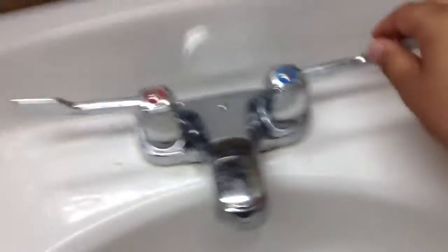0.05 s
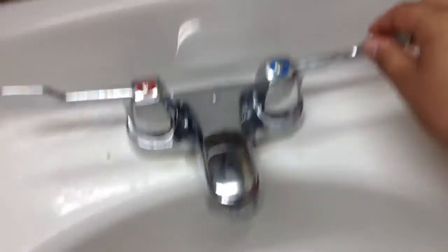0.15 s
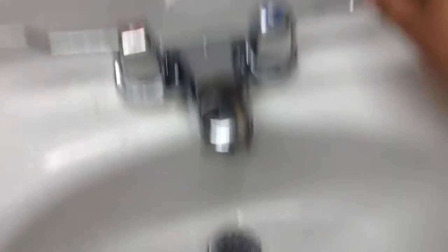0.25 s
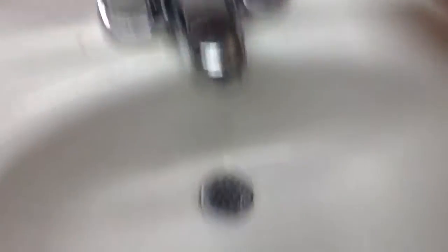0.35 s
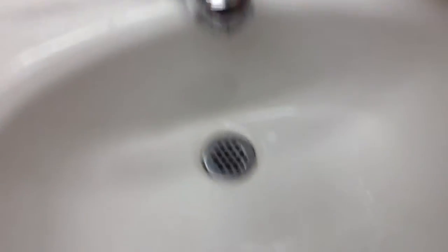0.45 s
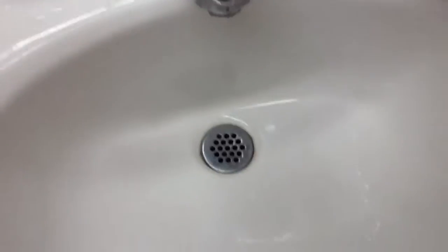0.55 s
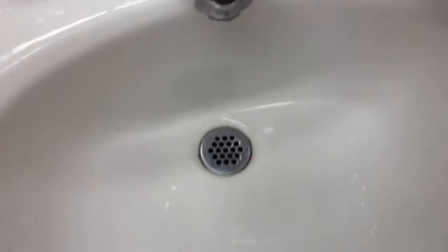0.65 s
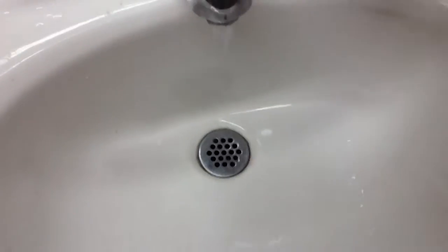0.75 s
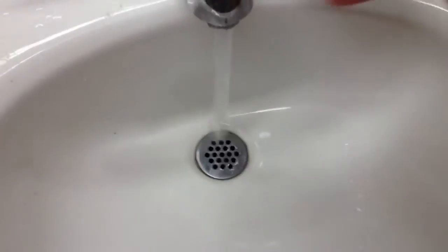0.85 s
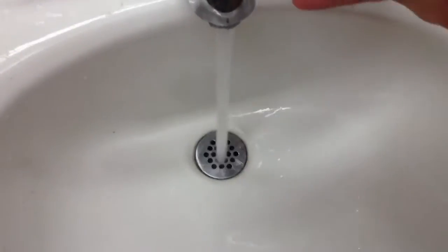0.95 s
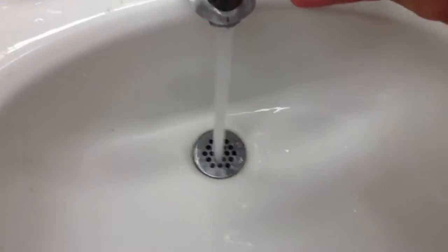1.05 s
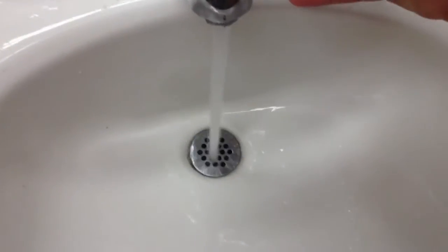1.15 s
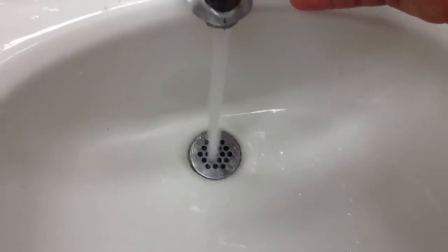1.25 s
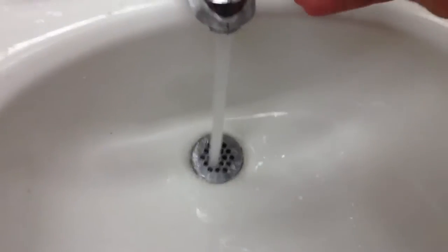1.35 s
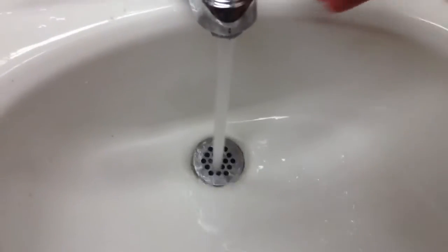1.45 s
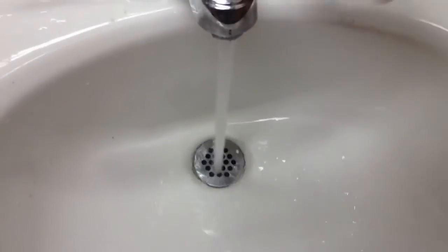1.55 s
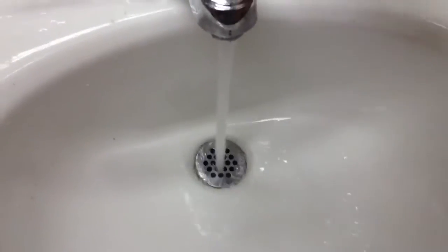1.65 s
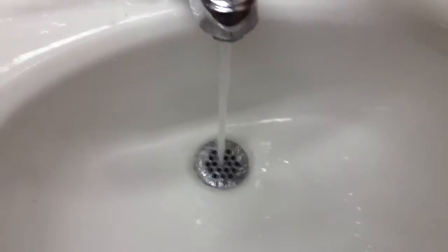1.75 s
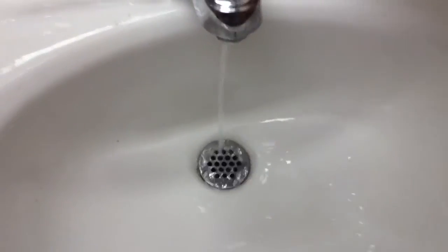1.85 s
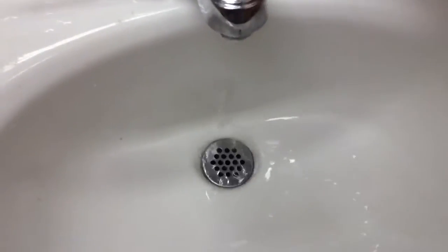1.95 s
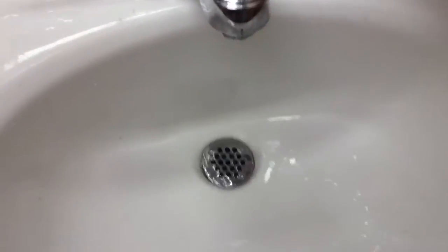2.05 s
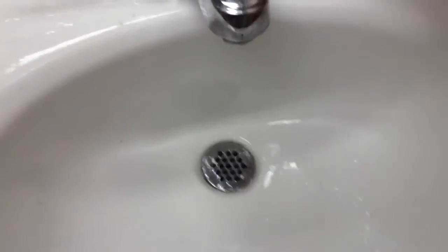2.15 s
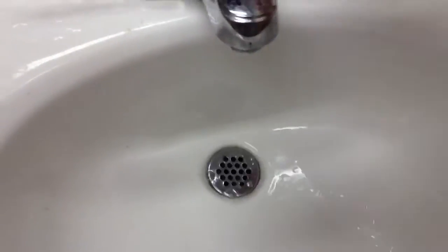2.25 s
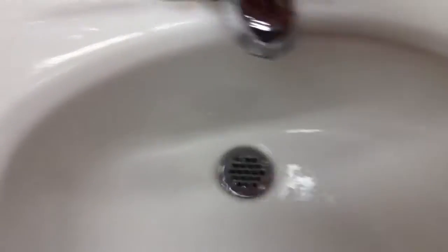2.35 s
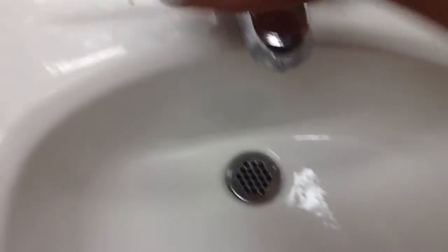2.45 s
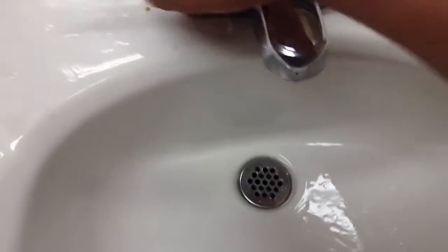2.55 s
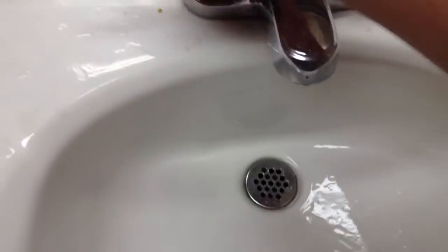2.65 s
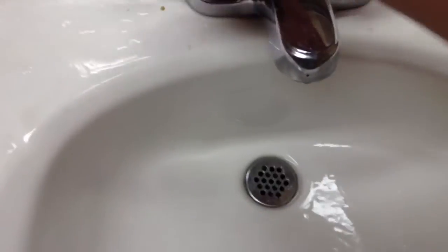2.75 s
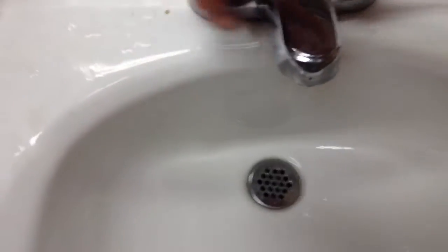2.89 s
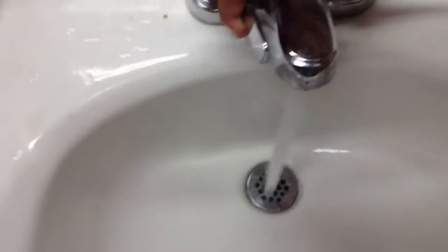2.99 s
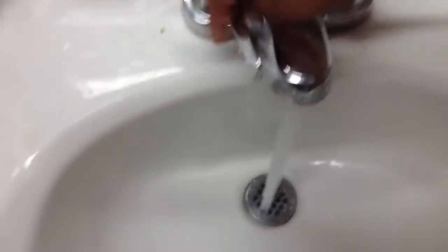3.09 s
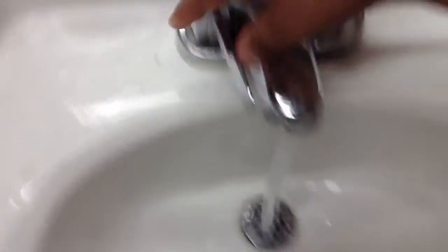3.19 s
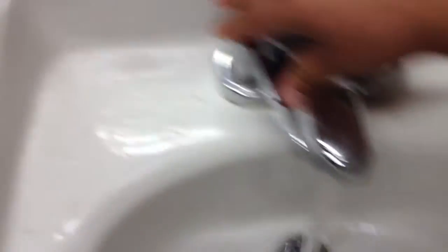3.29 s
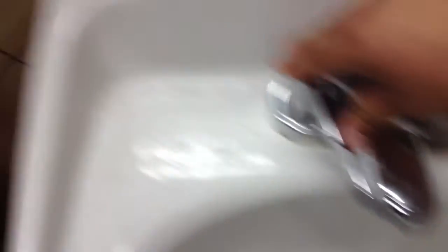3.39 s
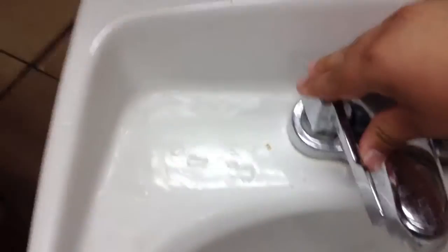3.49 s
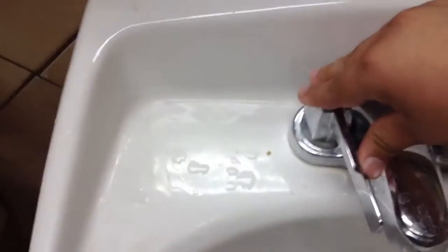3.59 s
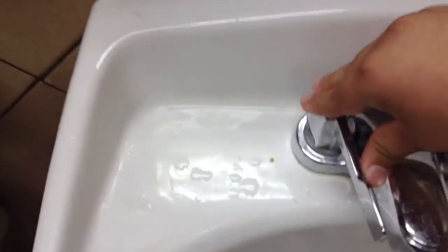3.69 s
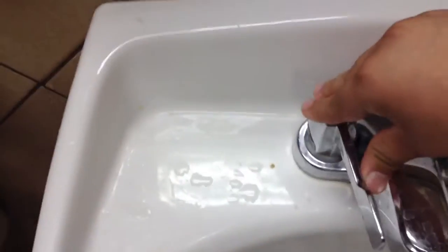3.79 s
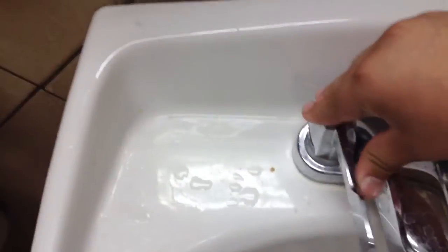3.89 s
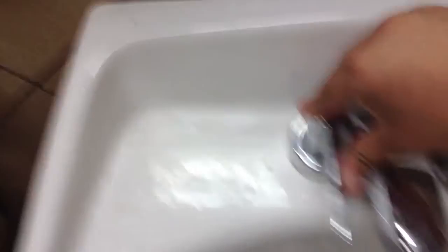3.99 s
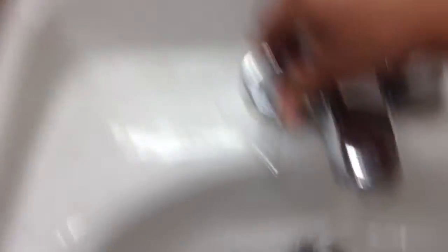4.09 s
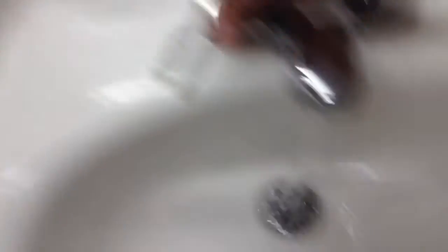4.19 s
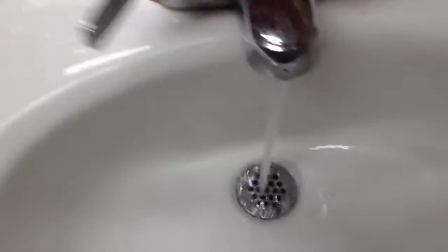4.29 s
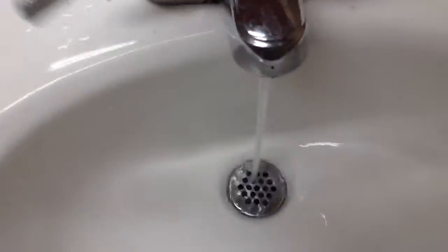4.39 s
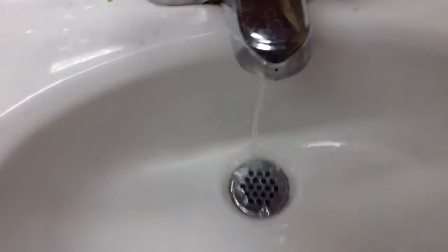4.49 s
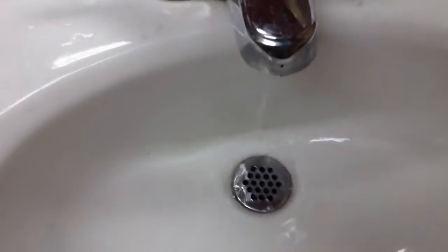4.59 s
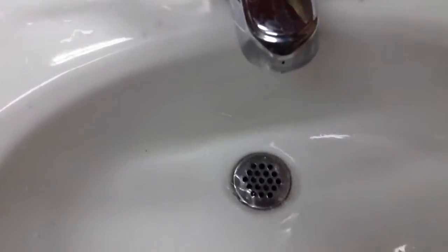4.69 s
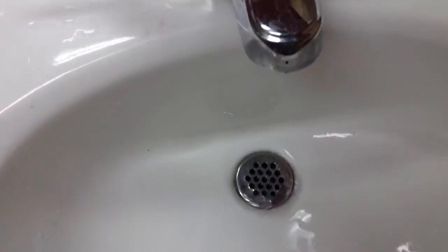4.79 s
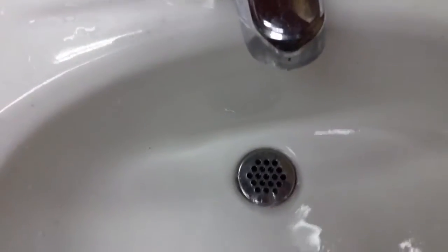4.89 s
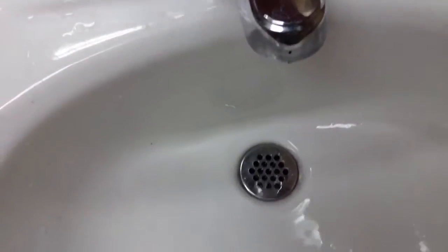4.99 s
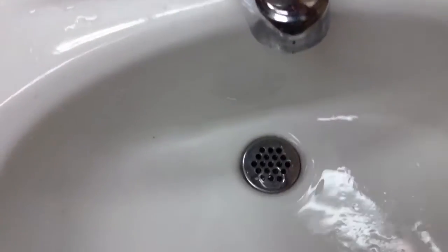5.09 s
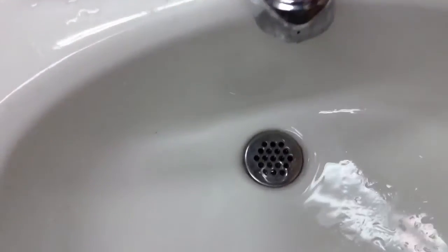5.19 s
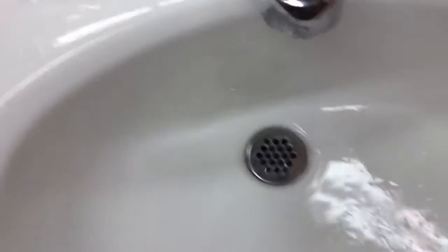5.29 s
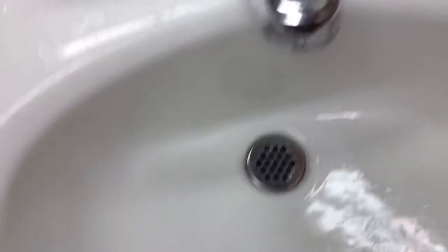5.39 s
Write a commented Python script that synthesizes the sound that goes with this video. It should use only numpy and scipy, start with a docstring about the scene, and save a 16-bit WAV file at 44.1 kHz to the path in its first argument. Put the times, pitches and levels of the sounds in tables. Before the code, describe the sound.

Two short bursts of hissing, gurgling tap water in a basin, the first framed by sharp metallic squeaks, each followed by scattered drips.

```python
"""Two-handle tap over a basin

A tap is opened and shut twice in a small tiled restroom. Random tiny impacts make the hiss and spatter
of the aerated stream, and resonances driven by them make the drain gurgle. Sliding tones make the first
handle's valve squeal as it opens and shuts, and short noise bursts make its handle click.
Last drops, bubbles and small ticks are dying notes, over a fan's wavering hum and the noise of moving air."""
import sys
import numpy as np
from scipy import signal
from scipy.fft import rfft, irfft
from scipy.io import wavfile
from scipy.ndimage import uniform_filter1d

SR = 44100
rng = np.random.default_rng(int(sys.argv[2]) if len(sys.argv) > 2 else 0)


def output_pcm(signal):
    """Save a mono or channel-first signal as 16-bit PCM at the path in sys.argv[1].

    Samples are clipped to [-1, 1] before scaling.
    """
    pcm = np.clip(np.atleast_2d(signal).T, -1, 1) * 32767
    wavfile.write(sys.argv[1], SR, np.round(pcm).astype(np.int16))


N = 239897
T = np.arange(N) / SR

# What each run of water does in the basin: (splash level [dB], splash resonance at full flow [Hz],
# in a thin stream [Hz], gurgle start [s], start of its ebb [s], gurgle level [dB])
RUNS = [(-26, 1485, 2030, 0.935, 1.725, -33.5), (-25.5, 1816, 1940, 3.03, 4.4, -34.5)]
# The flow through the aerator in each run, as its hiss before the stream's hiss gain:
# one list a run of (time [s], level [dB])
FLOW = [
    [(0.78, -34), (0.798, -35.5), (0.89, -21.5), (1.536, -20), (1.676, -24.5), (1.694, -31.5), (1.78, -28),
     (1.88, -54), (1.89, -45.5)],
    [(2.91, -48), (2.94, -21.5), (2.972, -19.5), (4.166, -22), (4.234, -31.5), (4.252, -28), (4.398, -26.5),
     (4.484, -50), (4.54, -55)],
]
# The tap spits as a valve opens or shuts:
# (time [s], hiss level [dB], splash level [dB], splash resonance [Hz])
SPURTS = [(0.598, -25, -36, 1950), (0.63, -13.5, -25, 2100), (0.737, -23, -33.5, 1805),
          (1.927, -21.5, -36.5, 1660), (2.797, -49, -47.5, 1960), (2.876, -27, -41, 1810),
          (4.593, -41, -54, 1670)]
# Spectrum of the hiss, also used for the handle's ticks: (frequency [Hz], relative level [dB per Hz])
HISS = [(300, -62), (1200, -36.5), (2400, -11.5), (3300, -7.5), (4500, -7), (6500, -1), (9000, 0.5),
        (11000, 2), (13000, 3.5), (15300, 0.5)]


def stream():
    """Tiny bursting bubbles hiss; larger drops spatter into a shifting resonance over the strainer."""
    # spectrum of the spatter: (frequency [Hz], relative level [dB per Hz])
    splash_spectrum = [(120, -55.5), (350, -49), (550, -22.5), (680, -9.5), (900, -5.5), (1150, -0.5),
                       (1600, -2), (2050, -0.5), (2350, -4), (3200, -0.5), (4300, -5.5), (8000, -23.5),
                       (15000, -13.5)]
    full_db, hiss_gain_db = -19, 5.5  # hiss in the flow table at full flow; gain of the running hiss
    # the splash weakens only this far below full flow, and dribbles on after it
    thin_db, dribble_db_per_s = -9, 63
    spurt_rise_s, spurt_hiss_db_per_s, spurt_splash_db_per_s = .006, 280, 149.5

    bubbles = impacts(per_s=9700, spread_db=-0.5)
    fizz = colour(bubbles + 0.86 * rng.standard_normal(N), HISS)
    fizz = fizz * amp(1.0 * wander(60))
    droplets = impacts(per_s=1800, spread_db=2)
    spatter = colour(droplets, splash_spectrum) * amp(0.28 * wander(28))
    flow_db = np.interp(T, *np.concatenate(FLOW).T) - full_db  # relative to full flow

    out = np.zeros(N)
    for rows, (splash_db, full_hz, thin_hz, *_) in zip(FLOW, RUNS):
        s, hiss_db = np.transpose(rows)
        landing = swell(s[0], s[-1], .015, dribble_db_per_s)
        landing = landing / np.hypot(1, amp(thin_db - flow_db))
        pocket_hz = np.interp(flow_db, [thin_db, 0], [thin_hz, full_hz])
        out += amp(hiss_gain_db) * level(s, hiss_db) * fizz
        out += amp(splash_db) * landing * splash(spatter, pocket_hz)
    for s, hiss_db, splash_db, hz in SPURTS:
        peak_s = s + spurt_rise_s
        out += amp(hiss_db) * swell(s, peak_s, spurt_rise_s, spurt_hiss_db_per_s) * fizz
        spit = swell(s, peak_s, spurt_rise_s, spurt_splash_db_per_s)
        out += amp(splash_db) * spit * splash(spatter, hz)
    depth_db = np.interp(flow_db, [-9, -1], [2.8, 1.1])  # a thin stream has fewer, clearer voices
    return bubble_cloud(out, depth_db, patch_db=2.1)


def splash(spatter, hz):
    """Spatter together with the pocket of air that it rings over the strainer."""
    pocket = unit(resonate(spatter, hz, 280))
    return amp(-4.5) * spatter + amp(-6) * pocket


def bubble_cloud(x, depth_db, patch_db):
    """Bubbles of like size colour the noise: slow narrow resonances (depth_db) and quick patches (patch_db)."""
    hz, t, z = signal.stft(x, SR, nperseg=1024, noverlap=768)
    slow, quick = uniform_filter1d(rng.standard_normal((2, *z.shape)), size=4, axis=1)
    slow = unit(uniform_filter1d(slow, size=90, axis=1))  # smooth along time
    quick = unit(uniform_filter1d(quick, size=7, axis=1))
    gain = amp(np.interp(t, T, depth_db) * slow + patch_db * quick)
    gain /= np.sqrt(np.mean(gain ** 2, axis=0))  # same mean power gain at every moment
    return signal.istft(z * gain, SR, nperseg=1024, noverlap=768)[1][:N]


def hissing_notes():
    """Brief filtered noise: whistles of the flow, a wide splashy burst, a high chirp before the second run."""
    # narrow or broad hissing notes: (start [s], end [s], pitch [Hz], filter width [Hz], level [dB])
    brief_notes = [(0.871, 1.02, 7160, 49, -24), (0.833, 1.67, 6600, 600, -28.5),
                   (1.482, 1.661, 14500, 400, -29), (1.735, 1.8, 2400, 1300, -30),
                   (2.748, 2.785, 12600, 900, -51), (3.237, 3.35, 11900, 200, -26),
                   (4.217, 4.419, 3030, 290, -36.5), (4.23, 4.434, 9900, 450, -25.5),
                   (4.3, 4.439, 1735, 134, -28), (4.32, 4.58, 6050, 120, -53)]
    out = np.zeros(N)
    for start, end, hz, width, db in brief_notes:
        add(out, start, amp(db) * noise_note(end - start, hz, width))
    return out


def gurgle():
    """Gulps of water and air ring the filled drain and ebb as the tap shuts; each spurt sends a trickle."""
    # air column of the drain: (frequency [Hz], filter width [Hz], relative level [dB])
    pipe_modes = [(173.7, 37, -7.5), (251.7, 53, 0), (339.7, 71, 4), (396.6, 33, -2), (419, 37, 1.5),
                  (499, 85, 0.5)]
    # low hollow notes, gulps of air and a faint thud of handling near the end:
    # (time [s], pitch [Hz], level [dB])
    hollow_notes = [(0.66, 270, -53), (1.116, 397.5, -35), (1.881, 259, -45.5), (2.81, 336, -53),
                    (3.09, 272, -39), (3.18, 394.3, -36.5), (4.56, 115, -60.5)]
    rise_s, ebb_db_per_s = 0.021, 69

    gulps = impacts(per_s=420, spread_db=2.5)
    pipe = sum(amp(db + 2 * wander(5.0)) * band(gulps, hz, width) for hz, width, db in pipe_modes)
    fill = sum(amp(db) * swell(start, ebb, rise_s, ebb_db_per_s) for *_, start, ebb, db in RUNS)
    trickle = sum(amp(db - 21) * swell(s, s + rise_s, rise_s, ebb_db_per_s) for s, _, db, _ in SPURTS)
    out = amp(-4.0) * unit(pipe) * np.hypot(fill, trickle)
    for s, hz, db in hollow_notes:
        add(out, s, amp(db) * noise_note(length=.1, hz=hz, width=19))
    return out


def noise_note(length, hz, width):
    """A brief note made of noise in a resonance, with soft ends."""
    tone = band(rng.standard_normal(SR), hz, width)[-round(length * SR):]
    return unit(tone) * signal.windows.tukey(len(tone), .4)


def squeal():
    """The stem sticks and slips; when strong and weak slips alternate, rough half-pitch lines appear."""
    # squeaks of the valve stem: (start [s], end [s], start pitch [Hz], end pitch [Hz], pitch arch [Hz],
    # level before the overall gain [dB], octave above that level [dB], half-pitch lines above it [dB])
    squeaks = [(0.366, 0.39, 6530, 6740, -20.5, -35, 12, 0.5), (0.387, 0.409, 6780, 7190, -11, -35, 2, 8.5),
               (0.419, 0.46, 7020, 6840, 300.5, -26.5, 1.5, -30),
               (0.458, 0.48, 5500, 4770, 3, -37.5, 10, -27),
               (0.477, 0.506, 7630, 7460, -300, -26.5, -4, 1.5),
               (0.514, 0.526, 4820, 5420, 1, -34, 12, -29.5), (0.524, 0.543, 6540, 7400, 200, -31.5, 2, -6),
               (0.576, 0.59, 7200, 7200, -0.5, -38, -15.5, -15),
               (1.664, 1.685, 6880, 6970, -150, -19.5, 0, -16.5),
               (1.688, 1.715, 7300, 7260, 27.5, -28, 17, -16),
               (1.727, 1.776, 7280, 7390, 104, -23, -5, -13.5),
               (1.782, 1.863, 7320, 7360, -0.5, -21.5, 10.5, -21.5),
               (1.869, 1.908, 7350, 7300, 3, -23, 16.5, -21), (1.904, 1.917, 7270, 7230, 1, -19, 10.5, 0),
               (1.918, 1.944, 7170, 7150, 0.5, -9, -13.5, -16)]
    # spectrum of the stem's rubbing: (frequency [Hz], relative level [dB per Hz])
    rasp_spectrum = [(500, -49.5), (2500, -22.5), (4500, -6), (7000, 0), (15000, -1)]
    rise_s, squeak_db_per_s = .007, 1500.5

    jitter = 1 + 0.0023 * wander(300)
    slip = .5 * wander(600)
    grip = amp(1.0 * wander(150))  # the contact pressure flutters
    grit = colour(rng.standard_normal(N), rasp_spectrum)
    # rubbing keeps the stem's lowest mode ringing
    stem = amp(-13) * band(rng.standard_normal(N), 3500, 100)
    out = np.zeros(N)
    for start, end, start_hz, end_hz, arch_hz, db, octave_db, half_db in squeaks:
        along = np.clip((T - start) / (end - start), 0, 1)
        hz = start_hz + (end_hz - start_hz) * along + arch_hz * np.sin(np.pi * along)
        phase = 2 * np.pi * np.cumsum(hz * jitter) / SR
        half = phase / 2 + slip
        clean = grip * (np.sin(phase) + amp(octave_db) * np.sin(2 * phase))
        rough = np.sin(half + phase) + amp(-13) * np.sin(half) + amp(-14.5) * grit
        squeak = clean + amp(half_db) * rough
        out += amp(db) * swell(start, end, rise_s, squeak_db_per_s) * squeak
        rubbing = stem + amp(-7.5) * grit
        out += amp(-44) * swell(start, end, rise_s, fall_db_per_s=259) * rubbing
    return amp(0.5) * out


def singing():
    """Two high modes of the tap's metal swell with the last squeal and ring on after the valve shuts."""
    # the two modes: frequency [Hz]
    modes_hz = [7187, 6690]
    modes_db, start_s, t60_s = (-25.5, -24.5), 1.93, 0.44
    out = np.zeros(N)
    for hz, db in zip(modes_hz, modes_db):
        add(out, start_s, amp(db) * ring(hz, t60_s) * (1 - dying(.06)))
    return out


def knocks():
    """The handle knocks in its play: a bright tick and a brief rattle through the modes of the metal."""
    # the knocks: (time [s], level [dB])
    handle_knocks = [(0.22, -27.5), (0.25, -37.5), (0.283, -28.5), (0.304, -30.5), (0.321, -32),
                     (0.35, -38.5), (0.597, -27), (0.632, -23), (2.8, -39)]
    # modes of the tap and its handle: (frequency [Hz], relative level [dB], time to fall 60 dB [s])
    metal_modes = [(736, -17, 0.5), (1005, -8.5, 0.17), (2055, 6.5, 0.03), (3500, -13.5, 0.48),
                   (4540, -3, 0.045), (5840, -3, 0.032), (6480, -1.5, 0.043), (7150, -13.5, 0.17),
                   (10790, -10, .1), (13300, -14, .08)]
    out = np.zeros(N)
    for s, db in handle_knocks:
        rattle = rng.standard_normal(SR)
        modes = np.zeros(SR)
        for hz, mode_db, t60 in metal_modes:
            modes += amp(mode_db) * band(rattle, hz, 120 + 0.024 * hz) * dying(t60)
        tick = colour(rng.standard_normal(N), HISS)[:SR] * dying(0.024)
        add(out, s, amp(db) * (amp(-8) * modes + amp(1.0) * tick))
    return out


def slaps():
    """Slugs of water, or the hand on the tap, give short noisy blows that sound the basin's hollow."""
    # dull blows on the basin: (time [s], level [dB], time to fall 60 dB [s])
    blows = [(0.597, -43, 0.54), (0.632, -27, 0.57), (0.795, -40, 0.064), (1.975, -35.5, 0.065),
             (2.716, -50.5, 0.78), (2.822, -42, 0.53), (4.575, -29, 0.095), (4.956, -51.5, 0.1)]
    # the hollow of the basin: (frequency [Hz], filter width [Hz], relative level [dB])
    basin_modes = [(280, 45, -3), (526.4, 9.2, 2.5), (790, 420, 6), (1030, 240, 4.5), (1430, 880, 11.5),
                   (2060, 380, 7), (3220, 1700, -8.5)]
    rumble_cut = signal.butter(2, 200, "high", fs=SR, output="sos")
    out = np.zeros(N)
    for s, db, t60 in blows:
        blow = signal.sosfilt(rumble_cut, rng.standard_normal(SR))
        hollow = unit(sum(amp(mode_db) * band(blow, hz, width) for hz, width, mode_db in basin_modes))
        add(out, s, amp(db) * hollow * dying(t60))
    return out


def ticks_and_drops(count=8):
    """Clear drops, bubbles and small ticks, and a few faint random drips that thin out after each run."""
    # clear single drops, bubbles and small ticks, some perhaps of the hand or valve:
    # (time [s], starting pitch [Hz], level [dB], time for the note to fall 60 dB [s])
    clear_ticks_and_drops = [(1.815, 8400, -10, .012), (1.845, 8000, -11.5, .013), (1.86, 8230, -16, 0.017),
                             (1.943, 1580, -23, 0.037), (1.975, 1310, -22, .044),
                             (1.975, 378, -27.5, 0.056), (2.357, 10330, -30.5, 0.015),
                             (2.423, 1250, -37.5, .02), (2.494, 898, -43, 0.022),
                             (2.642, 1490, -37.5, .038), (2.719, 1790, -30.5, 0.034),
                             (4.574, 910, -21.5, 0.017), (4.575, 2420, -22, 0.017),
                             (4.607, 8850, -21.5, .007), (4.608, 3070, -32, .02), (4.653, 3000, -36, 0.034),
                             (4.689, 3500, -22.5, 0.0042), (4.749, 1273, -30.5, .05),
                             (4.752, 885, -24.5, .02), (4.83, 5260, -44.5, 0.024), (4.87, 1410, -36, 0.03),
                             (4.937, 538, -38, 0.14), (4.923, 1320, -36, .03), (4.96, 1314, -32, 0.071),
                             (4.96, 385, -27.5, 0.036), (4.979, 871, -29, 0.046), (5.146, 3890, -45, 0.011),
                             (5.328, 500, -35.5, 0.1)]
    low_hz, high_hz = 1150, 3170  # range of the faint drips
    drip_db, drip_for_s, drip_db_per_s = -41, 0.72, 14.5
    out = np.zeros(N)
    for s, hz, db, t60 in clear_ticks_and_drops:
        add(out, s, amp(db) * tick_and_note(hz, t60))
    for rows in FLOW:
        for when, size in rng.random((count, 2)):
            wait = drip_for_s * when ** 2  # squaring crowds the drips towards the start
            hz = low_hz * (high_hz / low_hz) ** size
            drip = tick_and_note(hz, t60=.03)
            add(out, rows[-1][0] + wait, amp(drip_db - drip_db_per_s * wait) * drip)
    return out


def tick_and_note(hz, t60):
    """A short tick and a dying note, as of a drop and its trapped bubble, swelling over a few cycles."""
    tick = band(rng.standard_normal(SR), hz, min(0.25 * hz, 2200)) * dying(0.022)
    note = ring(hz, t60, rise=0.081)
    return (amp(-5.5) * note + amp(-7.5) * tick) * (1 - dying(7 / hz))


def fan():
    """A faintly wavering ventilation hum over the noise of moving air."""
    # spectrum of the moving air: (frequency [Hz], relative level [dB per Hz])
    air_spectrum = [(20, -57), (50, -30), (85, -29), (115, -17), (160, -8.5), (230, -17), (380, -33.5),
                    (520, -24), (680, -29.5), (1400, -26), (2300, -27.5), (3500, -39), (6000, -45),
                    (15000, -46.5)]
    hum_hz, hum_db, air_db = 177.5, -63.5, -61.5
    hum = np.sqrt(2) * np.sin(2 * np.pi * hum_hz * T + 0.13 * wander(2.8))
    hum = hum * amp(1.53 * wander(3))
    air = colour(rng.standard_normal(N), air_spectrum)
    return amp(hum_db) * hum + amp(air_db) * air


def room(x, wet_db, first_s):
    """Dense reflections off close tiled walls, the treble dying first."""
    # echo of the tiles: (frequency [Hz], time to fall 60 dB [s])
    tile_decay = [(150, 0.79), (500, 0.99), (1200, 0.73), (3000, 0.62), (7000, 0.56), (11000, 0.29),
                  (15000, 0.21)]
    taps = rng.choice([-1., 1.], SR) * (rng.random(SR) < 3000 / SR) * (T[:SR] > first_s)
    hz, t, z = signal.stft(taps, SR, nperseg=256)
    fade = np.exp(-np.log(1000) * t / read(tile_decay, hz)[:, None])
    tail = signal.istft(z * fade, SR, nperseg=256)[1]
    wet = signal.fftconvolve(x, tail / np.linalg.norm(tail))[:N]
    return (x + amp(wet_db) * wet) / np.hypot(1, amp(wet_db))


def amp(db):
    """Turns decibels into gain."""
    return 10 ** (np.asarray(db) / 20)


def unit(x):
    """Scales to an rms (average strength) of 1."""
    return x / np.sqrt(np.mean(x ** 2) + 1e-20)


def read(points, hz):
    """Reads a table of values against frequency, on a log-frequency axis."""
    f, value = np.transpose(points)
    return np.interp(np.log(hz + 1), np.log(f + 1), value)


def colour(x, points):
    """Filters x by a spectrum; rms 1."""
    gain = amp(read(points, np.fft.rfftfreq(N, 1 / SR)))
    return unit(irfft(rfft(x) * gain, N))


def level(s, db):
    """Gain along a dB curve, silent outside it."""
    return amp(np.interp(T, s, db, left=-np.inf, right=-np.inf))


def wander(hz):
    """Smooth random motion of rms 1, mostly slower than the given rate."""
    slowness = 1 + (np.fft.rfftfreq(N, 1 / SR) / hz) ** 4
    return unit(irfft(rfft(rng.standard_normal(N)) / slowness, N))


def swell(start, end, rise_s, fall_db_per_s):
    """Gain that rises from start, holds until end, then dies away."""
    return np.clip((T - start) / rise_s, 0, 1) * amp(-fall_db_per_s * np.maximum(T - end, 0))


def add(mix, s, sound):
    """Mixes a sound in at time s."""
    part = mix[round(s * SR):][:len(sound)]
    part += sound[:len(part)]


def resonate(x, hz, width):
    """A resonance of gain 1 at a fixed or moving frequency."""
    turn = np.exp(2j * np.pi * np.cumsum(hz * np.ones(len(x))) / SR)
    r = np.exp(-np.pi * width / SR)
    # shift the resonance down to 0 Hz, smooth there, and shift it back
    smooth = signal.lfilter([1 - r], [1, -r], x / turn + 1e-18)
    return 2 * (turn * smooth).real


def band(x, hz, width):
    """Two equal resonances in a row, for steep skirts; rms 1."""
    return unit(resonate(resonate(x, hz, width), hz, width))


def dying(t60):
    """One second of exponential decay that falls 60 dB in t60 seconds."""
    return np.exp(-np.log(1000) * T[:SR] / t60)


def ring(hz, t60, rise=0):
    """A dying sine; a bubble's pitch rises as it nears the surface."""
    pitch = hz * (1 + rise * np.minimum(T[:SR] / t60, 1))
    return np.sin(2 * np.pi * np.cumsum(pitch) / SR) * dying(t60)


def impacts(per_s, spread_db):
    """Random impacts of uneven size; rms 1."""
    size = amp(spread_db * np.minimum(rng.exponential(1, N), 4))
    happens = rng.random(N) < per_s / SR
    return unit(size * rng.choice([-1, 1], N) * happens)


def scene():
    """Water and tap close by with the room around them, the same in both channels."""
    water = stream() + hissing_notes() + gurgle() + slaps() + ticks_and_drops()
    water = room(water, wet_db=-7.5, first_s=0.003)
    tap = room(knocks() + squeal(), wet_db=-6.5, first_s=0.0033)
    return np.tile(water + tap + singing() + fan(), (2, 1))


def record(dry):
    """A steep low-pass filter removes the treble above about 15400 Hz."""
    lowpass = signal.firwin(401, 15400, window=("kaiser", 9), fs=SR)
    return signal.oaconvolve(dry, lowpass[None], "same")


dry = scene()
out = record(dry)
output_pcm(out)
```